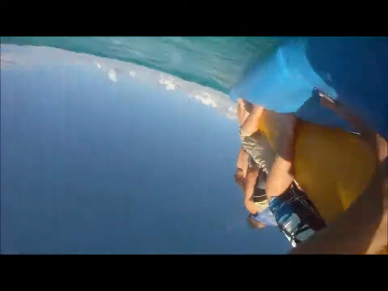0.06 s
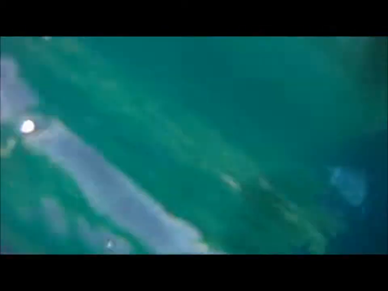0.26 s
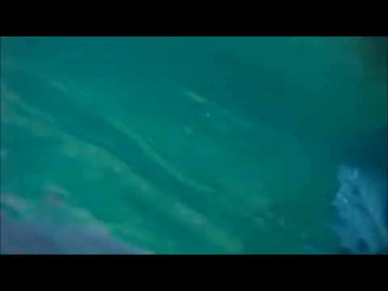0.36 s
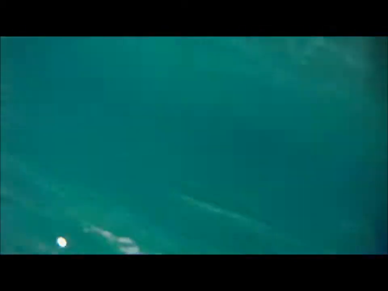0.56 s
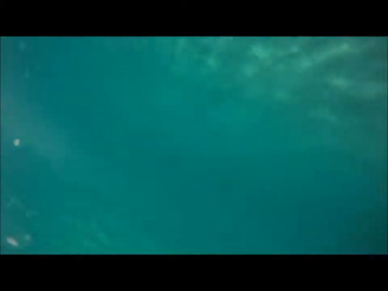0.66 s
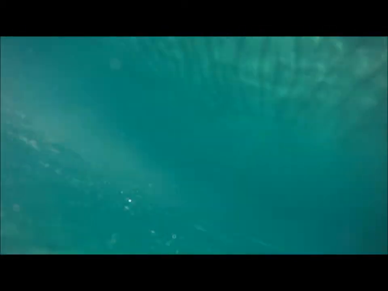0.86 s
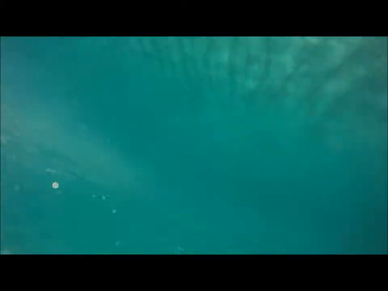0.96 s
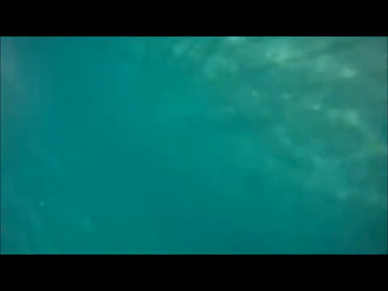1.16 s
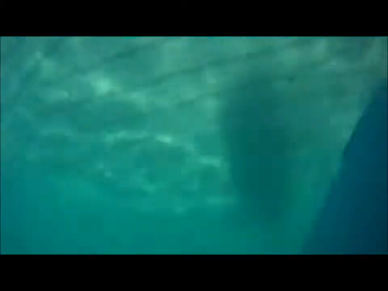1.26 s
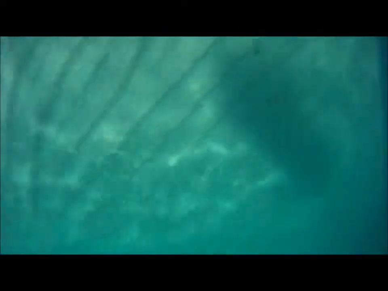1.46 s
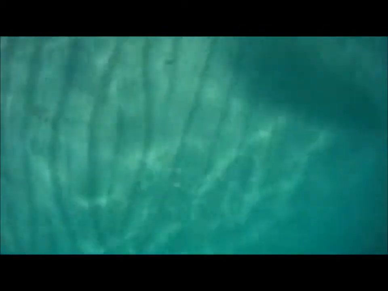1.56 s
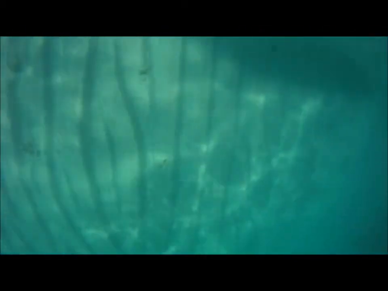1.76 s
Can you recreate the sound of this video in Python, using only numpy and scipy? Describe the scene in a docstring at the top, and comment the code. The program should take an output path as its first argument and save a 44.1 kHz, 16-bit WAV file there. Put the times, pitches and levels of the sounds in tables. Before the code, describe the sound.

Water splashes and churns as a waterproof camera plunges into the sea. Sharp, gritty slaps hit the case, bubbles pop and low thumps strike the microphone, over a rumbling fizz that thins as it sinks.

```python
"""In the sea, a camera in a waterproof case plunges under. After faint squeaks of spray, water slaps
the case, air pockets ring as bubbles and pressure surges thump the microphone; eddies throb briefly.
Underneath runs a rumbling churn of tiny bubbles that thins out as the case sinks.
The recorder overloads on the loudest blows and mirrors the near-mono sound into a gritty treble."""
import sys
import numpy as np
from scipy import signal
from scipy.fft import rfft, irfft, next_fast_len
from scipy.io import wavfile
from scipy.ndimage import uniform_filter1d

SR = 44100
rng = np.random.default_rng(int(sys.argv[2]) if len(sys.argv) > 2 else 0)


def pcm_store(signal):
    """Save signal as 16-bit PCM."""
    levels = np.round(np.clip(np.atleast_2d(signal), -1, 1) * 32767)
    wavfile.write(sys.argv[1], SR, levels.astype(np.int16).T)


N = 79380

# fader moves for the churning water: t/s, gurgle/dB, fizz/dB, rumble before its trim/dB
CHURN_FADERS = [(0, -39.5, -42, -47.5), (0.034, -57, -47.5, -45.5), (.07, -77, -62, -50.5),
                (.14, -54, -49.5, -41.5), (.19, -59, -36.5, -46), (0.202, -50.5, -28, -31),
                (0.211, -48, -25.5, -49), (0.226, -41, -20, -45), (.265, -48, -38, -44),
                (.29, -21, -40, -47), (.338, -47.5, -43, -59), (.43, -43, -34.5, -54),
                (0.498, -48, -31, -51), (0.513, -50.5, -45, -56), (.58, -52, -50.5, -33),
                (.63, -46, -45.5, -48.5), (.67, -42, -35.5, -35.5), (.74, -52, -50.5, -55),
                (.795, -51, -64, -47.5), (0.81, -49, -48.5, -31.5), (0.846, -79, -35, -54),
                (.885, -54, -56, -35.5), (.889, -31, -55, -29), (0.957, -32.5, -36, -39),
                (0.997, -54.5, -68.5, -43), (1.045, -46.5, -50.5, -27), (1.095, -56.5, -62, -37.5),
                (1.135, -43.5, -45.5, -32.5), (1.204, -47, -40, -36.5), (1.218, -81, -61, -42.5),
                (1.251, -61, -62.5, -47), (1.28, -51, -43.5, -28), (1.37, -47, -49.5, -38.5),
                (1.41, -70, -72, -51.5), (1.47, -63.5, -44.5, -23.5), (1.55, -33.5, -43, -30),
                (1.62, -49.5, -53, -36.5), (1.69, -64.5, -62.5, -43), (1.8, -63.5, -63, -46)]
# tone of the larger bubbles, the small ones and the flow past the case: f/Hz, gain/dB
GURGLE_EQ = [(150, -2.5), (400, -8), (600, -3.5), (780, 4.5), (1050, -8), (1800, -0.5), (3000, -21),
             (6000, -46.5)]
FIZZ_EQ = [(300, -29), (900, 0), (1500, -8.5), (2100, 1), (2800, -8.5), (3500, -2), (4400, -8),
           (5500, -8.5)]
RUMBLE_EQ = [(15, -8.5), (40, 14.5), (100, -5), (200, -11.5), (400, -16), (1500, -54)]
# pressure surges on the case: t/s, level before filtering/dB, build-up/s, release/s
SURGE_CUES = [(0.03, -11, 0.014, 0.017), (0.137, -21, 0.0047, 0.0077), (.237, -1, 0.001, 0.0012),
              (.298, -27, 0.0005, 0.0011), (0.356, -7.5, 0.00032, 0.00048), (.703, -1, 0.012, 0.0015),
              (0.7741, 8.5, 0.00029, 0.0021), (.85, -3, 0.0002, .004), (1.053, 1.5, 0.00037, 0.0035),
              (1.1096, -5, 0.00033, 0.009), (1.2954, 1, 0.0025, 0.0031), (1.3575, 7, 0.0022, 0.0035),
              (1.477, -7, 0.00085, 0.0077), (1.5187, 2, 0.0002, 0.0005), (1.588, -19, 0.0023, 0.0012),
              (1.63, -23, 0.0025, 0.0034)]
# squeaks of spray before the plunge: t/s, level/dB, f/Hz, decay/s
SQUEAK_CUES = [(.068, -45, 3630, 0.019), (0.09, -49.5, 3900, 0.042), (0.108, -53, 4890, 0.049)]
# water slapping the case: t/s, level/dB, ring f/Hz, rise/s, decay/s, spray send/dB
SLAP_CUES = [(0.2287, 7, 1574, .0013, 0.0012, -6), (.2395, -18.5, 1970, .001, 0.009, -5),
             (0.288, -14.5, 1900, .002, 0.0047, -14), (.299, -20, 895, .001, .002, 0.5),
             (0.3094, -11.5, 1380, 0.00025, 0.0017, -8.5), (.356, 3.5, 1700, .0002, 0.0019, -13),
             (0.3923, -4.5, 1800, 0.0011, 0.0015, -24), (.431, -16, 1665, .004, 0.0033, -21),
             (0.4442, -13.5, 2890, .0005, 0.0032, -10), (0.4509, -5.5, 1784, 0.00054, 0.0012, -5.5),
             (.458, -1.5, 1955, .0004, .0018, -6.5), (.469, -39, 2030, .0005, .002, 12.5),
             (0.504, -43, 2160, .003, 0.001, 16), (0.5516, -18.5, 3960, .0004, 0.0017, 5),
             (0.5632, -24, 2050, .0005, 0.0066, -5), (0.5706, -16, 1850, .0004, 0.0017, -3.5),
             (0.6, -11, 2210, .0002, 0.0026, -6), (0.6317, -15.5, 1540, .0002, 0.0011, -1.5),
             (.6955, -11.5, 1900, 0.00089, 0.001, -7.5), (.701, -11.5, 252, 0.0084, 0.0044, -14),
             (0.7034, 4, 1787, .002, 0.00057, 0), (0.712, -24, 2000, .002, 0.0023, -8.5),
             (0.7737, 1, 1675, .0002, 0.0014, -11), (0.7745, -13, 556, .0003, 0.0026, -25),
             (.8493, -21, 680, .0002, 0.0081, -19.5), (1.0542, -3, 1775, .0002, 0.0019, -14.5),
             (1.0547, -6.5, 740, 0.00021, 0.0026, -16), (1.0783, -27, 2000, 0.0029, 0.0027, -7),
             (1.108, -13, 1740, .0002, 0.0021, -39), (1.1088, -14.5, 702, 0.00023, 0.005, -18),
             (1.1274, -27.5, 1733, .0004, 0.016, -12.5), (1.2664, -38.5, 1430, 0.00032, .003, -18),
             (1.2937, -24.5, 540, .0005, 0.0037, -10.5), (1.3477, -13, 1880, .0004, 0.0034, -36),
             (1.4272, -29, 2840, 0.00025, 0.00063, 4), (1.459, -26, 820, .0003, 0.0098, -10.5),
             (1.5183, -25.5, 556, .0003, 0.012, -19), (1.5291, -19, 1400, .0002, 0.0011, -2.5),
             (1.5971, -33, 1500, .0003, 0.0022, -21), (1.6473, -30, 1500, .001, 0.0031, -8.5),
             (1.691, -50, 1500, .0005, 0.0028, -11), (1.7324, -28, 1600, .0002, 0.0015, -27),
             (1.7423, -31, 1400, .0003, 0.0022, -5.5), (1.776, -42, 1300, .0003, .003, -12.5)]
# tone of the slapped case and of the spray on top: f/Hz, gain/dB
CASE_EQ = [(100, -4.5), (250, -13.5), (430, -12.5), (720, 4), (1100, -2.5), (2200, 2.5), (2700, -7.5),
           (3500, -5.5), (4400, -9), (5300, -21.5), (6000, -16)]
SPRAY_EQ = [(1200, -12), (2600, -14), (3300, -1.5), (3650, 10), (4100, -12), (4800, -8.5), (5350, -9),
            (5900, -21.5)]
# single bubbles: t/s, level/dB, starting f/Hz, swell/s, decay/s
BUBBLE_CUES = [(0.2384, -6, 866, 0.0015, 0.0035), (.2387, -5, 1133, 0.00067, .0035),
               (0.2777, -10, 2330, 0.0005, 0.0038), (0.287, -21, 1700, .001, .003),
               (0.3129, -13, 920, 0.00054, 0.0053), (0.3558, 0.5, 1614, 0.00043, 0.0018),
               (0.365, -18, 805, 0.0015, 0.0061), (0.389, -4, 1890, 0.0014, 0.0015),
               (0.4505, -1, 1630, 0.0013, 0.0023), (0.5169, -16.5, 520, 0.00067, 0.0082),
               (0.601, -12, 747, 0.0021, 0.003), (.6002, -12.5, 2350, 0.0007, .003),
               (.678, -17, 649, 0.0065, 0.014), (.732, -28.5, 712, .004, 0.012),
               (1.0746, -28, 1270, .0015, 0.0029), (1.331, -30, 2010, 0.0024, 0.0018),
               (1.344, -15.5, 1349, 0.00036, .004), (1.3468, -18.5, 696, 0.00062, 0.0034),
               (1.349, -16, 1270, 0.0016, 0.0046), (1.3478, -3.5, 2118, 0.00082, .003),
               (1.4278, -16, 2050, .0006, 0.0028), (1.4381, -16, 1950, 0.00063, 0.0037),
               (1.4552, -13.5, 1975, 0.00071, 0.0018), (1.4885, -24, 1970, .0015, 0.002),
               (1.644, -28.5, 1434, 0.0006, 0.0082), (1.7327, -28.5, 1094, 0.00043, 0.0035)]
# water fluttering past the case: t/s, length/s, level/dB, centre f/Hz
FLUTTER_CUES = [(1.126, 0.097, -27.5, 97.2)]
# tone of the recorder's input: f/Hz, gain/dB
RECORDER_EQ = [(200, -1), (400, -4), (550, -1), (2000, 1.5), (3200, 2), (4200, -0.5), (5350, 0), (5650, 3),
               (6000, -4)]


def amp(db):
    """Decibels to gain."""
    return 10 ** (np.asarray(db) / 20)


def unit(x):
    """Scale to rms 1."""
    return x / np.sqrt(np.mean(x ** 2) + 1e-20)


def filtered(x, response):
    """Filter x by a response given as a function of frequency."""
    size = next_fast_len(len(x) + 8192)
    return irfft(rfft(x, size) * response(np.fft.rfftfreq(size, 1 / SR)), size)[:len(x)]


def noise(response, size=N):
    """Filtered noise at rms 1."""
    return unit(filtered(rng.standard_normal(size), response))


def eq(points, hz):
    """Gain at hz of an EQ curve drawn on a log frequency axis."""
    f, db = np.transpose(points)
    return amp(np.interp(np.log(hz + 1), np.log(f), db))


def resonance(f, hz, q):
    """Response of one damped resonance."""
    return 1j * f * hz / q / (hz * hz - f * f + 1j * f * hz / q)


def burst(t, rise, decay):
    """Exponential rise to 1 at t = 0, then exponential decay."""
    return np.exp(np.where(t < 0, t / rise, -t / decay))


def add(track, s, sound):
    """Mix a sound into the track from time s."""
    part = track[max(round(s * SR), 0):][:len(sound)]
    part += sound[:len(part)]


def even_noise(response, size):
    """Filtered noise with its level ridden flat, so an envelope alone shapes the hit."""
    x = filtered(rng.standard_normal(size), response)
    return x / np.sqrt(np.abs(uniform_filter1d(x * x, size=90)) + 1e-12)


def bubble_swarm(tone, centre_hz, grains_per_s=900, decay_cycles=4.9, wash_db=-6.5):
    """Countless tiny bubbles, each a damped sine, on a wash of noise; rms 1."""
    count = int(grains_per_s * N / SR)
    when, size = rng.random((count, 2)).T
    hz = np.clip(centre_hz * np.exp(0.464 * rng.standard_normal((count, 1))), 200, 6000)
    age = np.arange(1000)  # samples
    cycles = hz * age / SR
    gain = amp(-np.log(1 - .96 * size))[:, None]
    grains = gain * np.sin(2 * np.pi * cycles) * np.exp(-cycles / decay_cycles)
    positions = (when * N).astype(int)[:, None] + age
    cloud = np.bincount(positions.ravel(), grains.ravel())[:N]
    tint = lambda f: eq(tone, f)
    return unit(unit(filtered(cloud, tint)) + amp(wash_db) * noise(tint))


def churn(rumble_trim_db=1.5):
    """The bed: larger bubbles gurgle, small ones fizz, and the flow past the case rumbles."""
    times, *faders = np.transpose(CHURN_FADERS)
    gurgle, fizz, rumble = [amp(np.interp(np.arange(N) / SR, times, db)) for db in faders]
    flow = noise(lambda f: eq(RUMBLE_EQ, f))
    return (gurgle * bubble_swarm(GURGLE_EQ, centre_hz=820)
            + fizz * bubble_swarm(FIZZ_EQ, centre_hz=2332)
            + amp(rumble_trim_db) * rumble * flow)


def surges(low_hz=50, top_hz=330, damping=1.55):
    """Suction builds and lets go; the microphone leaks slow pressure and swings back with a thump."""
    t = np.arange(N) / SR
    pressure = -sum(amp(db) * burst(t - s, rise, release) for s, db, rise, release in SURGE_CUES)
    leak = lambda f: -f * f / (low_hz ** 2 - f * f + 1j * damping * f * low_hz)
    return filtered(pressure, lambda f: leak(f) / (1 + (f / top_hz) ** 2))


def squeaks(rise_s=0.002):
    """Spray whistles thinly in narrow bands of noise."""
    t = np.arange(N) / SR
    whistle = lambda hz: noise(lambda f: resonance(f, hz, q=8.8) ** 2)
    return sum(amp(db) * burst(t - s, rise_s, decay) * whistle(hz) for s, db, hz, decay in SQUEAK_CUES)


def slaps(ring_top_hz=4280):
    """Each slap rings the case for a few milliseconds, with brighter spray on top."""
    rings, sprays = np.zeros(N), np.zeros(N)
    t = (np.arange(4096) - 1024) / SR  # pre-roll leaves room for the attack
    for s, db, hz, rise, decay, spray_db in SLAP_CUES:
        envelope = amp(db) * burst(t, rise, decay)
        ring = even_noise(lambda f: resonance(f, hz, q=4) * eq(CASE_EQ, f), len(t))
        spray = even_noise(lambda f: eq(SPRAY_EQ, f), len(t))
        add(rings, s + t[0], envelope * ring)
        add(sprays, s + t[0], amp(spray_db) * envelope * spray)
    return filtered(rings, lambda f: 1 / (1 + (f / ring_top_hz) ** 2) ** .5) + sprays


def bubbles(glide=0.042, wobble_depth=0.48):
    """A wobbling air pocket swells into a wavering tone whose pitch lifts slightly as it dies."""
    out, t = np.zeros(N), np.arange(SR // 10) / SR
    for s, db, hz, swell, decay in BUBBLE_CUES:
        pitch = hz * (1 + glide * (1 - np.exp(-t / (swell + decay))))
        tone = np.sin(2 * np.pi * np.cumsum(pitch) / SR)
        envelope = np.minimum(t / swell, 1) * np.exp(-np.maximum(t - swell, 0) / decay)
        wobble = noise(lambda f: np.exp(-(f / (0.1 * hz)) ** 2), len(t))
        add(out, s, amp(db) * envelope * (1 + wobble_depth * wobble) * tone)
    return out


def flutter(drift_depth=0.21):
    """Eddies shed by the case make a short, uneven low throb."""
    out = np.zeros(N)
    for s, length, db, hz in FLUTTER_CUES:
        drift = noise(lambda f: np.exp(-(f / 60) ** 2))[:int(length * SR)]
        phase = 2 * np.pi * np.cumsum(hz * np.exp(drift_depth * drift)) / SR
        add(out, s, amp(db) * signal.windows.tukey(len(phase), .2) * np.sin(phase))
    return out


def scene(width_db=-47):
    """The water mix as heard through the case; left and right are all but identical."""
    water = slaps() + bubbles() + surges() + churn() + flutter() + squeaks()
    side = amp(width_db) * filtered(water, lambda f: 1j * np.sign(f))  # 90-degree phase shift
    return np.array([water + side, water - side])


def record(dry, ceiling=0.88, hold_hz=12000, top_hz=15600):
    """The input clips; slow sample-and-hold then mirrors the sound into the treble as grit."""
    clipped = np.clip(dry, -ceiling, ceiling)
    coloured = [filtered(x, lambda f: eq(RECORDER_EQ, f)) for x in clipped]
    slow = signal.resample_poly(coloured, hold_hz, SR, axis=1)
    steps = np.repeat(slow, 4, axis=1)
    held = signal.resample_poly(steps, SR, 4 * hold_hz, axis=1)[:, :N]
    high_cut = lambda f: 1 / (1 + (f / top_hz) ** 90)
    return np.array([filtered(x, high_cut) for x in np.clip(held, -1, 1)])


dry = scene()
out = record(dry)
pcm_store(out)
```